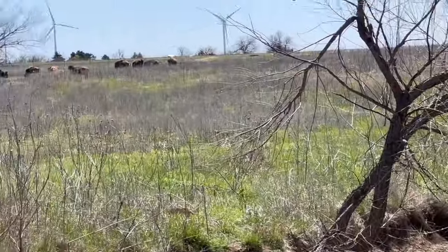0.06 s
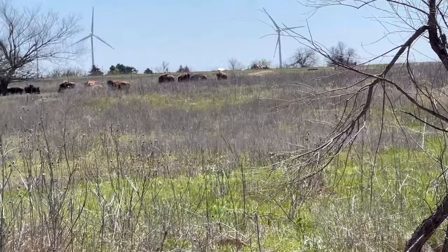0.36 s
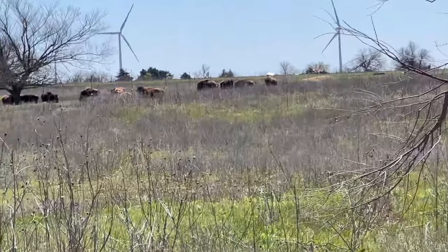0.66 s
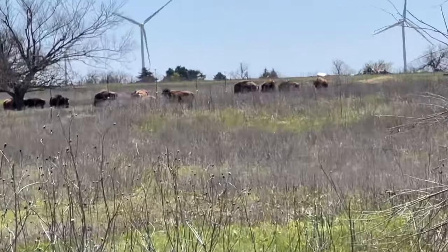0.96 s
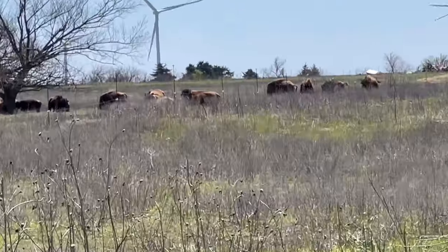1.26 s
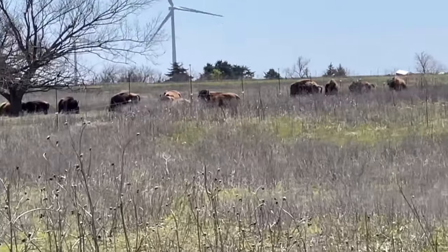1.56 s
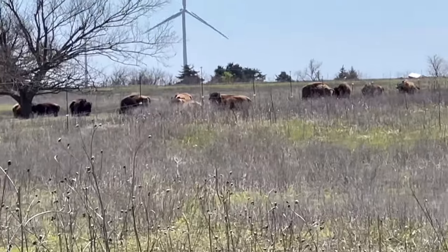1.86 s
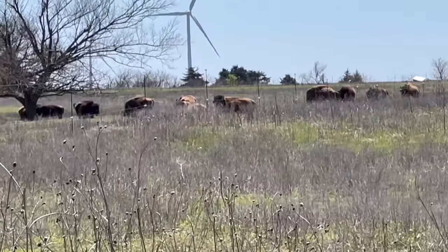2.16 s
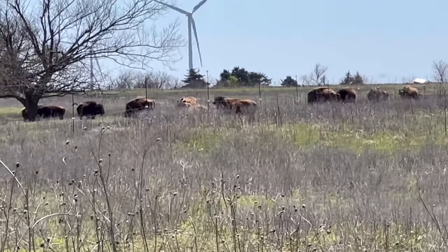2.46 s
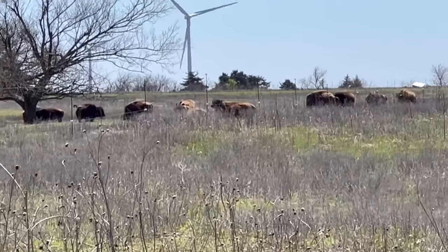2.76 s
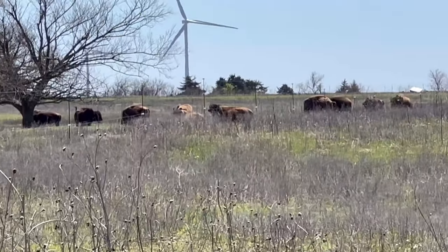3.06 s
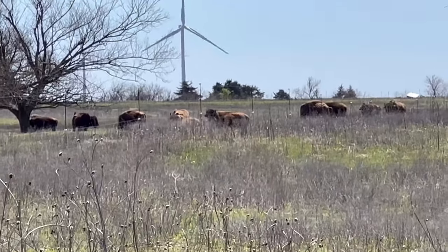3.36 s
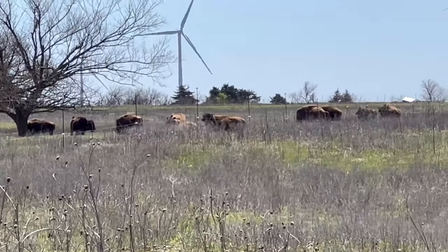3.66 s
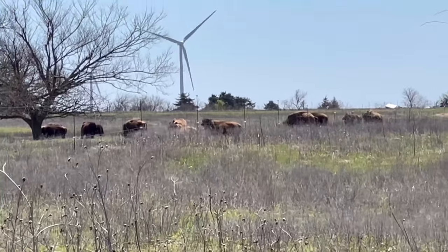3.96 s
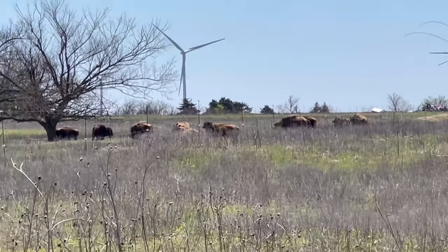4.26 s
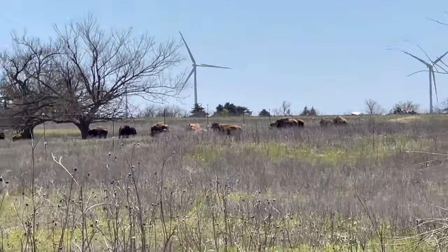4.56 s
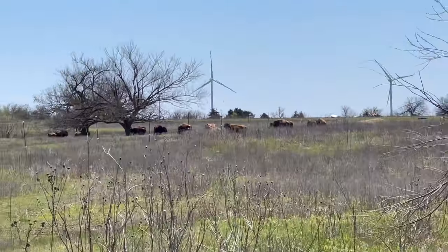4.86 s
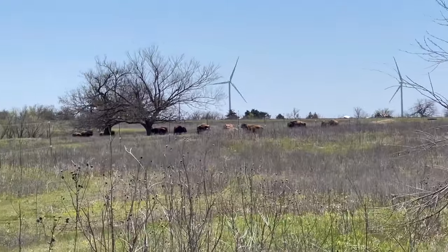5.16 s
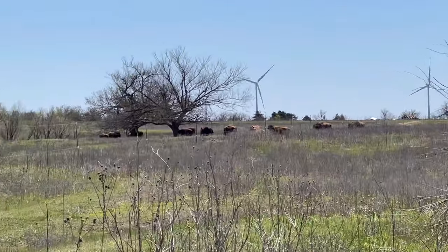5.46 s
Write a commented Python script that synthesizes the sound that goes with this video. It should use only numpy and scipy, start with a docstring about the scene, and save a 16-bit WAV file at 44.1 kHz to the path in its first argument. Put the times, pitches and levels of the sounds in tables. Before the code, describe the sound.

Wind buffets and dull handling bumps hit the microphone outdoors, with quick repeated bird chirps and short, dry insect rattles behind.

```python
"""Open pasture. A bird repeats a two-part chirp about three times a second; a second, farther bird
whistles thin falling notes. Two insects rattle in short, sometimes overlapping bursts of dry snaps,
one per wingbeat. Wind rumbles on a hand-held microphone and rushes in the grass. Buffets, steps
and handling thump the microphone; the hand knocks its housing, which rings briefly."""
import sys
import numpy as np
from scipy import signal
from scipy.fft import rfft, irfft, next_fast_len
from scipy.io import wavfile
from scipy.ndimage import map_coordinates

SR = 44100
rng = np.random.default_rng(int(sys.argv[2]) if len(sys.argv) > 2 else 0)


def materialize(psi):
    """Save the field psi as 16-bit PCM at rate SR to the path in sys.argv[1].

    A 1-D psi becomes a single channel; in a 2-D psi each row is a channel.
    """
    bounded = np.clip(np.atleast_2d(psi).T, -1, 1)
    quanta = np.round(bounded * 32767).astype(np.int16)
    wavfile.write(sys.argv[1], SR, quanta)


N = 243431


def chirping_bird(pitch_hz=2736, push_hz_per_db=4, break_width_s=.0038, flip_ratio=1.3):
    """Clear arch, upward flip at the voice break, falling note, rasp. A harder push is higher, brighter."""
    # (time [s], level [dB], second-part accent [dB], break offset [s], break depth [dB],
    #  flip gain [dB], fall by 65 ms [oct], tail level [dB])
    chirps = [(-.025, -63.5, 0, 0.055, 6, -16, 0.14, -79), (.274, -65, 0.5, .033, -3, -14, 0.23, -74),
              (.567, -65, 2.5, 0.036, 9, -16, 0.18, -76), (.872, -67, 2, 0.04, -1, -14, 0.12, -77.5),
              (1.165, -70.5, 3, 0.025, 5, -9, 0.085, -76), (1.467, -64.5, 3.5, 0.033, 3, -17, 0.12, -74),
              (1.76, -65.5, 3, 0.026, 5, -14, 0.039, -77), (2.054, -64, 1, 0.024, 2, -16, 0.054, -81),
              (2.35, -66.5, 3.5, 0.031, 13, -20, 0.071, -74.5),
              (2.633, -63, -0.5, 0.033, 15, -5, 0.11, -71.5), (2.949, -64, 3.5, .036, 16, -11, 0.21, -76.5),
              (3.258, -66, 1, 0.038, 10, -12, .24, -76), (3.557, -73, -3, 0.021, 5, -15, 0.18, -81),
              (3.847, -65.5, 0.5, .025, -1, -13, .25, -75.5), (4.142, -66.5, 0, .032, 9, -12, .26, -74),
              (4.429, -65, 1, 0.032, 6, -10, 0.16, -76), (4.724, -71, 1, 0.038, 4, -9, .12, -74.5),
              (5.023, -71, 1, 0.025, 6, 2, .14, -86), (5.331, -70.5, 2.5, 0.031, 4, -13, 0.15, -77)]
    # melody, an arch then a smaller one: (offset [s], pitch ratio [1])
    arch = [(0, .96), (.006, .99), (.018, 1.015), (.026, .995), (.032, .985), (.04, 1), (.05, .992)]
    out, t = np.zeros(N), np.arange(SR // 6) / SR
    n = len(t)
    mean_db = np.mean([row[1] for row in chirps])
    max_fall_oct = max(row[6] for row in chirps)
    for start_s, level_db, accent_db, break_s, depth_db, flip_db, fall_oct, tail_db in chirps:
        push_db = level_db - mean_db
        hz = pitch_hz + push_hz_per_db * push_db
        fallen_oct = fall_oct * np.clip((t - .025) / .04, 0, 1.15) ** 2
        melody = np.interp(t, *np.transpose(arch)) * 2 ** -fallen_oct
        angle = phase(hz * melody * (1 + .012 * wobble(220, n)))
        dip = amp(-depth_db * np.exp(-((t - break_s) / break_width_s) ** 2))
        second_part = (1 + np.tanh((t - break_s) / break_width_s)) / 2
        note_db = level_db + accent_db * second_part + 2.2 * wobble(180, n)
        overtone_db = -20 - 26.5 * fall_oct + .35 * push_db + 4.1 * wobble(130, n)
        overtone = amp(overtone_db) * np.sin(2 * angle + .79 * wobble(550, n))
        flip = amp(flip_db) * np.sin(flip_ratio * angle + wobble(400, n))
        voice = dip * (np.sin(angle) + overtone) + (1 - dip) * flip
        note = amp(note_db) * voice * gate(t, .001, .051, .0015)
        # release: the note flicks down and splits off a higher, irregular branch
        flick = np.sin(angle + wobble(400, n)) * gate(t, .043, .078, .0023)
        flick *= amp(level_db - 8.5) * fall_oct / max_fall_oct
        rasp_hz = np.interp(t, [.05, .075], [2850, 3100]) + 380 * wobble(1500, n)
        rasp = amp(-2.5) * np.sin(phase(rasp_hz)) * gate(t, .03, .082, .008)
        slur_hz = np.interp(t, [.06, .105], [3380, 2850]) + 140 * wobble(350, n)
        slur = np.sin(phase(slur_hz)) * gate(t, .063, .095, .008)
        tail = (rasp + slur) * amp(tail_db + 2.8 * wobble(350, n))
        add(out, start_s, np.sqrt(2) * (note + flick + tail))
    return out


def whistling_bird(swell_db_per_oct=59, attack_s=.012):
    """Pure notes that swell as their pitch sags, plus a few hoarse ones."""
    # (time [s], length [s], start pitch [Hz], sag [oct], mid-note level [dB])
    whistles = [(0, 0.2, 1723, 0.18, -73.5), (0.145, 0.036, 4530, 0.11, -81),
                (1.23, 0.22, 2412, 0.017, -78), (1.3, 0.15, 3366, .02, -80),
                (2.418, .118, 3590, 0.1, -77.5), (2.564, 0.059, 3060, 0.051, -74),
                (2.897, 0.12, 4200, 0.12, -82), (3.042, 0.031, 4530, 0.04, -77.5),
                (3.144, 0.16, 3980, 0.026, -77), (3.388, 0.12, 4784, 0.038, -81),
                (3.561, 0.054, 4050, 0.098, -76.5), (3.737, 0.15, 3173, 0.055, -71)]
    # hoarse notes: (time [s], length [s], pitch [Hz], level [dB])
    scratches = [(0.022, 0.14, 4520, -86.5), (0.95, 0.086, 2740, -81), (1.017, 0.033, 2980, -70),
                 (1.048, 0.038, 2920, -79), (2.779, 0.14, 4510, -87.5), (3.718, 0.022, 2900, -74)]
    out, t = np.zeros(N), np.arange(SR // 3) / SR
    for start_s, length_s, start_hz, sag_oct, level_db in whistles:
        fallen_oct = sag_oct * np.clip(t / length_s, 0, 1)
        hz = start_hz * 2 ** -fallen_oct * (1 + .0034 * wobble(110, len(t)))
        swell_db = swell_db_per_oct * (fallen_oct - sag_oct / 2)
        db = level_db + .1 + swell_db + 1.7 * wobble(55.3, len(t))
        envelope = (1 - np.exp(-t / attack_s)) * gate(t, 0, length_s - .004, .007)
        add(out, start_s, amp(db) * envelope * np.sin(phase(hz)))
    for start_s, length_s, hz, db in scratches:
        envelope = amp(db + 2.6 * wobble(300, len(t))) * gate(t, .0025, length_s, .004)
        add(out, start_s, envelope * np.sin(phase(hz + 300 * wobble(1150, len(t)))))
    return np.sqrt(2) * out


def insects(gain_db=9.3, scatter_db=1.7, jitter_s=.0002, rustle_db=-29.5):
    """Two insects, bursts sometimes overlapping: one dry snap per wingbeat, faint rustle between."""
    # bursts: (time [s], hold [s], release [s], wingbeat rate [Hz], level [dB])
    rattles = [(.3225, .045, .06, 62.2, -55), (.4935, .135, .42, 59.2, -52), (.5935, .08, .2, 63.4, -58),
               (.8965, .05, .06, 60, -59), (.926, .1, .03, 61.8, -60), (1.0185, .15, .008, 58, -52.5),
               (1.852, .02, .02, 60, -63), (1.919, .115, .125, 60.2, -53.5)]
    # single ticks: (time [s], level [dB])
    stray_snaps = [(2.25, -69), (3.493, -73), (5.2255, -71)]
    # snap spectrum: (frequency [Hz], level [dB])
    spectrum = [(2000, -35), (3700, -7.5), (4900, -4.5), (5900, 1), (7100, 3), (8200, 1), (9200, -0.5),
                (10500, -4.5), (12900, -10.5), (15000, -5.5), (15800, -2)]
    snaps, rustle, t = np.zeros(N), np.zeros(N), np.arange(SR // 200) / SR
    envelope = np.exp(-t / .0003) * (1 - np.exp(-t / .00015))
    hits = list(stray_snaps)
    for start_s, hold_s, release_s, rate_hz, db in rattles:
        beats_s = np.arange(44) / rate_hz
        hits += list(zip(start_s + beats_s, db + burst_db(beats_s, hold_s, release_s)))
        rustle += amp(db + rustle_db + .4 * burst_db(np.arange(N) / SR - start_s, hold_s, release_s))
    colour = lambda hz: unit(amp(along(spectrum, hz)))
    snap_colour = colour(np.fft.rfftfreq(len(t), 1 / SR))
    for start_s, db in hits:
        snap = envelope * rng.standard_normal(len(t))
        snap /= np.linalg.norm(irfft(rfft(snap) * snap_colour))  # unit energy once coloured
        onset_s = start_s + jitter_s * rng.standard_normal()
        add(snaps, onset_s, amp(db + gain_db + scatter_db * rng.standard_normal()) * snap)
    return ports(filtered(snaps + rustle * rng.standard_normal(N), colour))


def burst_db(t, hold_s, release_s, attack_s=.02, range_db=13):
    """Attack, hold and release of one rattle, re its peak."""
    corners_s = np.cumsum([0, attack_s, hold_s, release_s])
    return np.interp(t, corners_s, [-range_db, 0, 0, -range_db], left=-200, right=-200)


def thumps(bass_cut_hz=54, gain_db=-1):
    """Each blow is a brief push and a scuff; the microphone's bass cut makes it swing a few times."""
    # (time [s], level [dB], low-pass corner [Hz])
    blows = [(.023, -25.5, 150), (.047, -22.5, 169), (0.196, -26.5, 253), (.248, -21, 171),
             (0.276, -23, 400), (.301, -22.5, 201), (.37, -32, 148), (.453, -31.5, 128), (0.957, -43, 98),
             (1.334, -34, 118), (1.447, -32, 111), (1.781, -33.5, 180), (1.932, -30, 138),
             (2.115, -33.5, 137), (2.203, -32.5, 127), (2.423, -32, 159), (2.479, -28.5, 128),
             (2.575, -29, 139), (2.988, -26.5, 90), (3.231, -29, 130), (3.37, -33, 96), (3.637, -32, 79),
             (4.075, -33, 101.4), (4.848, -27, 108), (5.416, -23, 139)]
    out, t = np.zeros((2, N)), np.arange(SR // 6) / SR
    bass_cut = signal.butter(5, bass_cut_hz, 'high', fs=SR, output='sos')
    push = np.exp(-((t - .004) / .0014) ** 2)
    for start_s, db, corner_hz in blows:
        scuff = np.array([wobble(921, len(t)), wobble(896, len(t))])  # one per port
        blow = push + .18 * scuff * gate(t, .0046, .023, .0073)
        dull = signal.sosfilt(signal.butter(2, corner_hz, fs=SR, output='sos'), blow)
        swing = signal.sosfilt(bass_cut, dull)
        add(out, start_s, amp(db + gain_db) * swing / np.abs(swing).max())
    return out


def knocks(t60_s=.032, attack_s=.002, sag_oct_per_t60=.31, gain_db=3):
    """The hand knocks the housing; it rings a few cycles and sinks in pitch under the grip."""
    # (time [s], level [dB], start pitch [Hz])
    hits = [(.035, -31.5, 260), (.098, -40.5, 476), (.17, -38, 300), (.202, -31.5, 190), (.24, -30, 310),
            (.277, -26, 330), (.299, -26, 315), (0.377, -34, 202), (.447, -39.5, 292), (.537, -37, 177),
            (1.786, -42, 257), (2.49, -39, 190), (4.13, -34, 191), (4.829, -47, 560), (5.408, -34, 209)]
    out, t = np.zeros(N), np.arange(SR // 12) / SR
    attack = 1 - np.exp(-(t / attack_s) ** 2)
    for start_s, db, hz in hits:
        ring = np.sin(phase(hz * 2 ** (-sag_oct_per_t60 * t / t60_s)))
        add(out, start_s, amp(db + gain_db - 60 * t / t60_s) * attack * ring)
    return out


def shudders(lead_s=.03):
    """An eddy rocks the air at the microphone at one low, unsteady pitch."""
    # (time [s], length [s], level [dB], pitch [Hz])
    eddies = [(1.41, .041, -39, 88), (2.438, .15, -38, 75.8), (3.181, 0.035, -31, 67.3),
              (4.121, .067, -27.5, 60.6), (5.36, 0.11, -33.5, 85.3)]
    out, t = np.zeros(N), np.arange(SR // 5) / SR
    for start_s, length_s, db, hz in eddies:
        rocking = np.sin(phase(hz * (1 + .11 * wobble(60, len(t)))))
        add(out, start_s - lead_s, amp(db) * gate(t, lead_s, lead_s + length_s, .008) * rocking)
    return out


def microphone_wind(buffet_gain_db=4, flutter_gain_db=-.5):
    """Turbulence on the microphone: deep buffet and higher flutter share the same lumps."""
    # (time [s], buffet level [dB], flutter level [dB])
    gusts = [(0.09, -45, -50.5), (0.18, -44.5, -48.5), (0.36, -49.5, -53), (0.47, -45.5, -59.5),
             (0.72, -59.5, -63), (1.03, -59, -57.5), (1.53, -51.5, -55.5), (2.06, -50.5, -49.5),
             (2.24, -52.5, -55), (2.45, -50, -53), (2.93, -53, -55.5), (3.14, -44.5, -54.5),
             (3.31, -46, -54.5), (3.9, -50, -55), (4.31, -46.5, -55.5), (4.67, -50, -53.5),
             (4.96, -49, -55), (5.52, -42, -54)]
    # spectra: (frequency [Hz], density [dB])
    buffet_spectrum = [(15, -37), (30, -14.5), (45, 2), (64, 3.5), (88, -1), (130, -10), (220, -27.5),
                       (500, -89)]
    flutter_spectrum = [(50, -40), (100, -2.5), (150, -1.5), (300, -4.5), (450, -10), (800, -30),
                        (2000, -71.5)]
    buffet_db, flutter_db = curves(gusts)
    lumps = wobble(26)
    buffet = amp(buffet_db + buffet_gain_db + 1.5 * lumps) * rush(buffet_spectrum)
    flutter = amp(flutter_db + flutter_gain_db + 2.1 * lumps + wobble(40)) * rush(flutter_spectrum)
    return (buffet + flutter) * amp([[.3], [-.3]])


def field_wind(grass_gain_db=10, moan_db=-70.5, moan_expansion=1.6, hiss_db=-71):
    """Wind in the grass: smooth rush, hollow moan, faint hiss."""
    # (time [s], rush level [dB], moan contour [dB])
    breeze = [(0.38, -69, -69.5), (0.81, -71.5, -69), (1.5, -69.5, -63.5), (2.31, -70, -56.5),
              (2.67, -69, -63), (3.13, -68, -62), (3.8, -72, -68), (4.8, -68, -63.5), (4.83, -67.5, -56),
              (5.0, -67.5, -64), (5.52, -69, -59.5)]
    # spectra: (frequency [Hz], density [dB])
    grass_spectrum = [(100, -20), (300, 2), (550, -2), (800, -6), (1200, -17.5), (2000, -28), (4000, -56.5),
                      (9000, -68)]
    moan_spectrum = [(300, -33), (470, -4), (590, 2.5), (700, -13), (1000, -32.5), (2500, -70.5)]
    hiss_spectrum = [(300, 8), (900, 17), (1500, 7.5), (2800, 4.5), (3500, 0.5), (4300, -4.5), (5500, -4),
                     (7000, -3.5), (8200, -31.5), (10000, -11.5), (12000, -21), (14500, -18), (15800, -29)]
    grass_db, contour_db = curves(breeze)
    grass = amp(grass_db + grass_gain_db + .89 * wobble(8.3)) * rush(grass_spectrum)
    moan = amp(moan_db + moan_expansion * (contour_db - contour_db.mean())) * rush(moan_spectrum)
    hiss = amp(hiss_db + 1.1 * wobble(4.89)) * rush(hiss_spectrum)
    return (grass + moan) * amp([[.7], [-.7]]) + hiss


def tree_line(x, delay_s=.065, echo_db=-13):
    """Direct sound plus one reflection off the trees."""
    return filtered(x, lambda hz: 1 + amp(echo_db) * np.exp(-2j * np.pi * hz * delay_s))


def field_scatter(x):
    """Diffuse stereo echo from trees and ground."""
    # (frequency [Hz], t60 [s])
    decay = [(500, 0.2), (3000, 0.2), (10000, 0.035)]
    hz, t, noise = signal.stft(rng.standard_normal((2, SR // 2)), SR, nperseg=256)
    tail = signal.istft(noise * amp(-60 * t / along(decay, hz)[:, None]), SR, nperseg=256)[1]
    return signal.fftconvolve(x[None], tail / np.linalg.norm(tail[0]), axes=1)[:, :N]


def ports(x):
    """Direct sound reaches the two microphone ports with a frequency-dependent phase difference."""
    # (frequency [Hz], left lead [rad])
    lead = [(1500, -0.5), (2760, 1), (4700, -1.5), (6400, 1), (7300, 0.4), (7750, 2.6), (8250, -1),
            (8800, 2.4), (9700, .8), (10500, 1.3), (13300, -0.6), (14600, 3), (15500, 2)]
    return filtered(x, lambda hz: np.exp(.5j * along(lead, hz) * np.array([[1], [-1]])))


def rush(spectrum):
    """Stereo noise, mid at rms 1, nearly mono in the bass."""
    # (frequency [Hz], side re mid [dB])
    width = [(60, -15), (200, -11), (380, -8.5), (700, -2), (1300, -2.5), (2400, -15), (4400, -17.5),
             (7000, -29), (8200, 22.5), (11000, -20.5)]

    def response(hz):
        return amp(along(spectrum, hz)) * np.array([np.ones_like(hz), amp(along(width, hz))])

    mid, side = filtered(rng.standard_normal((2, N)), response)
    return np.array([mid + side, mid - side]) / np.std(mid)


def amp(db):
    """Decibels to gain."""
    return 10 ** (np.asarray(db) / 20)


def unit(x):
    """Scale to rms 1."""
    return x / np.sqrt(np.mean(x ** 2) + 1e-20)


def along(points, hz):
    """Interpolate (Hz, value) points on a log axis."""
    knots_hz, values = np.transpose(points)
    return np.interp(np.log(hz + 1), np.log(knots_hz + 1), values)


def curves(rows):
    """Per-sample curve for each column after the time."""
    times_s, *columns = np.transpose(rows)
    return [np.interp(np.arange(N) / SR, times_s, column) for column in columns]


def wobble(rate_hz, size=N):
    """Smooth curve through random knots."""
    knots = rng.standard_normal(int(size * rate_hz / SR) + 4)
    return map_coordinates(knots, [np.arange(size) * rate_hz / SR])


def filtered(x, response):
    """Apply response(hz) by FFT."""
    size = next_fast_len(N + SR // 2)
    return irfft(rfft(x, size) * response(np.fft.rfftfreq(size, 1 / SR)), size)[..., :N]


def add(track, start_s, sound):
    """Mix a sound into a track, cropped to fit."""
    i = round(start_s * SR)
    part = sound[..., max(-i, 0):max(N - i, 0)]
    track[..., max(i, 0):max(i, 0) + part.shape[-1]] += part


def gate(t, start_s, end_s, edge_s):
    """Soft-edged window."""
    return (1 + np.tanh((t - start_s) / edge_s)) * (1 + np.tanh((end_s - t) / edge_s)) / 4


def phase(hz):
    """Running phase [rad] of a gliding pitch."""
    return 2 * np.pi * np.cumsum(hz) / SR


def scene():
    """Birds, insects and breeze in the field; blows and turbulence at the microphone."""
    near = chirping_bird()
    far = tree_line(whistling_bird())
    echo = field_scatter(amp(-13) * near + amp(-6.5) * far)
    birds = ports(near + far) * amp([[-.4], [.4]]) + echo
    return birds + insects() + thumps() + knocks() + shudders() + microphone_wind() + field_wind()


def record(dry):
    """Brick-wall band limit."""
    return filtered(dry, lambda hz: hz < 15850)


dry = scene()
out = record(dry)
materialize(out)
```